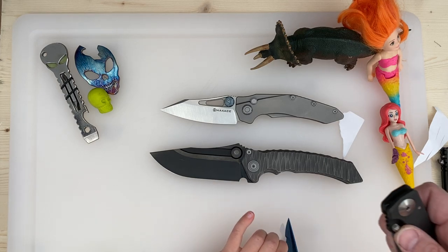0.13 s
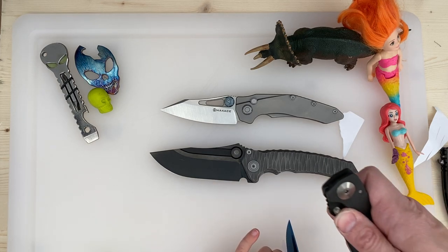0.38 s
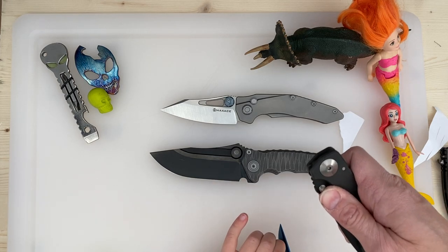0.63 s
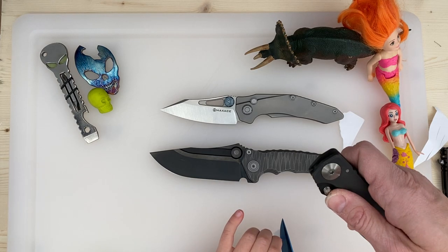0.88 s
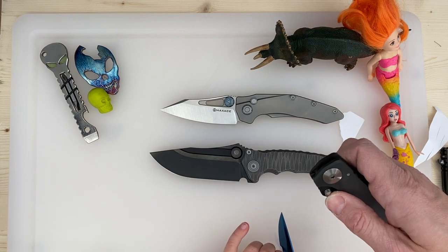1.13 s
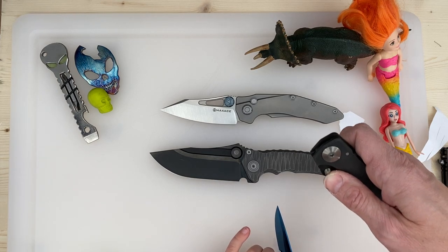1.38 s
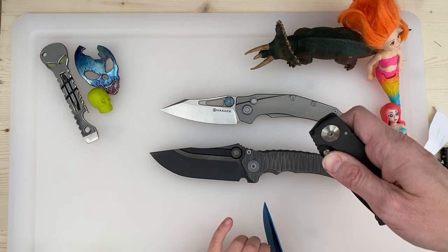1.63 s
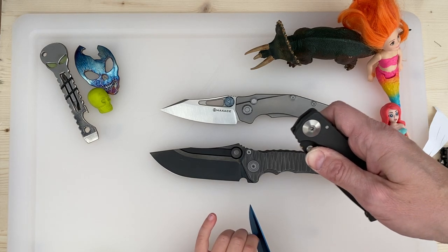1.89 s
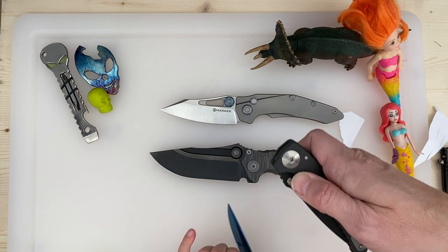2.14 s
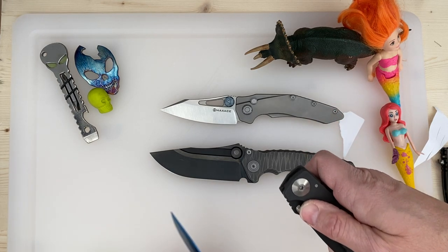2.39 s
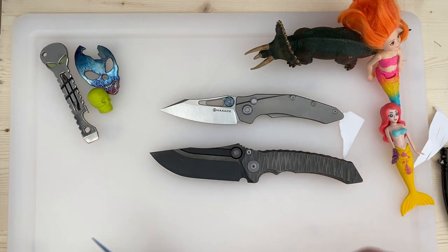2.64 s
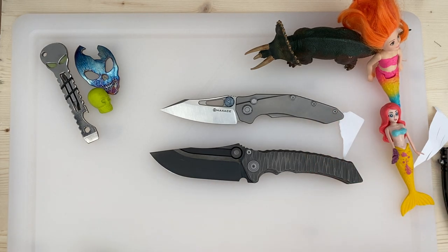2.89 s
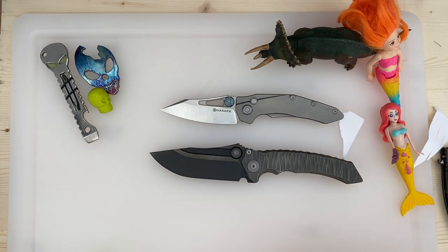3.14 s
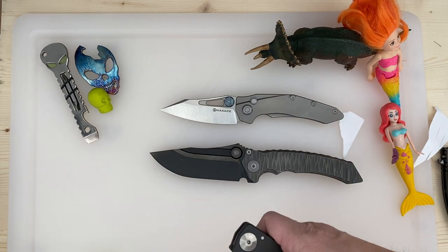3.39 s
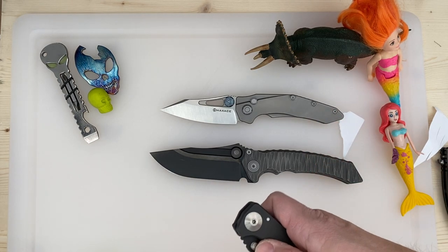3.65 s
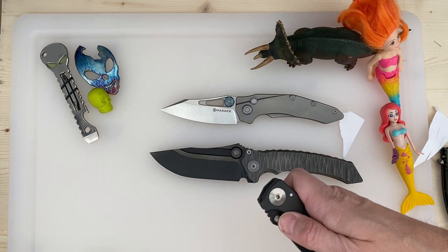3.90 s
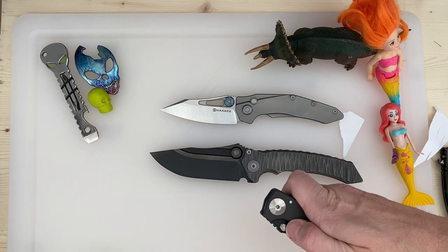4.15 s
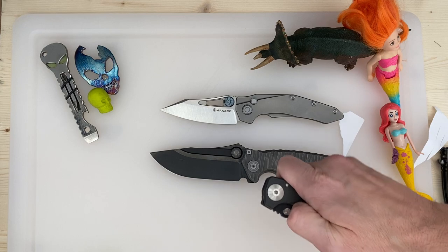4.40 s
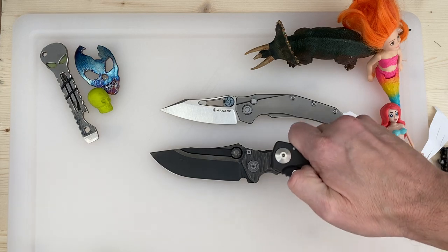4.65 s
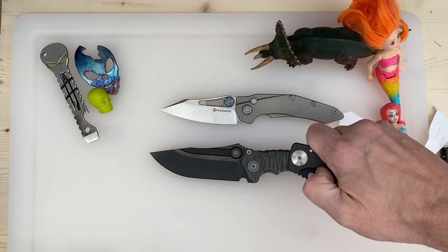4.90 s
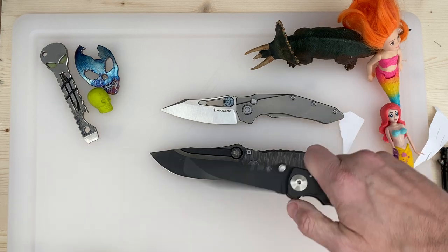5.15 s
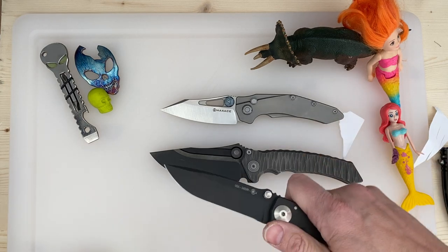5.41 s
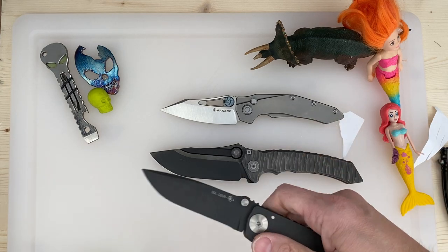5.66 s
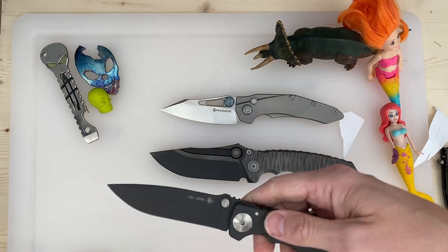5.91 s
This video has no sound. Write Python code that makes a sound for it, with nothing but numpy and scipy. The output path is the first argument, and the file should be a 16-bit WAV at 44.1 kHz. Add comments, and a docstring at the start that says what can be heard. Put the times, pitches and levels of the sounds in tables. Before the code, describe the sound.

In a quiet room with soft air noise and a low appliance drone, fingers and a blade brush a cutting board in short, dry, whispery strokes. They grow brighter and busier, with tiny ticks and a few soft thuds. A hand then shifts on a knife handle, and the blade flicks open with one loud, sharp metal snap and a brief rattle. Faint skin rubbing follows. Close stereo microphone, little reverberation.

```python
"""Board strokes and a folding knife in a quiet room

Steady noise and wavering low bands form the room tone and an appliance's drone. Fingers and a blade
slide in short strokes over a cutting board: dense micro-slips, coloured by board resonances, with ticks
and soft thuds of filtered noise. A hand shifts its grip on a folding knife and flicks it open: the blade
slips its detent and snaps into its lock, as damped modes, noise bursts and dying chatter."""
import sys
import numpy as np
from scipy import signal
from scipy.fft import rfft, irfft
from scipy.io import wavfile

SR = 44100
rng = np.random.default_rng(int(sys.argv[2]) if len(sys.argv) > 2 else 0)


def volts_from_decibels(level):
    """Turn decibel levels (scalar or array-like) into linear amplitude factors."""
    exponent = np.asarray(level, float) / 20
    return 10 ** exponent


def dump_mix(stems):
    """Bounce the given channels to the path in sys.argv[1] as a 16-bit WAV at rate SR."""
    frames = np.atleast_2d(stems).T  # one column per channel
    limited = np.clip(frames, -1, 1)  # hard clip at full scale
    pcm = np.round(limited * 32767).astype(np.int16)
    wavfile.write(sys.argv[1], SR, pcm)


N = 266099  # samples

# Spectrum of the air noise, relative: [f/Hz, density/dB per Hz]
AIR_SPECTRUM = [(20, -89.5), (50, -83), (80, -79), (105, -80.5), (160, -88), (250, -94.5), (330, -97.5),
                (620, -103), (1200, -102.5), (1600, -108), (2600, -109), (4000, -117), (6000, -124),
                (12000, -129), (16000, -136)]
# Left-right correlation of the room tone: [f/Hz, correlation]
ROOM_CORRELATION = [(30, .94), (100, 0.93), (170, 0.89), (380, 0.077), (950, .1), (2400, 0.065),
                    (15000, 0.17)]
# Left over right in the room tone: [f/Hz, level difference/dB]
ROOM_BALANCE = [(60, 1), (180, -4), (550, 1.5), (1650, 0), (4970, 5), (15000, -4)]
# Drone bands of the appliance: [f/Hz, full width at half amplitude/Hz, rms level/dB]
DRONE = [(96.5, 9.4, -62.5), (120.9, 8, -66), (242.4, 14, -76)]
# Decay of the room tail: [f/Hz, T60/s]
ROOM_T60 = [(500, 0.16), (2000, 0.47), (4500, 0.4), (8000, 0.3), (15000, 0.11)]
# Left-right correlation of the room tail: [f/Hz, correlation]
TAIL_CORRELATION = [(500, .2), (2000, .35), (5000, .5), (9000, 0.74), (15000, 0.76)]
# Fifth-octave band edges, f/Hz
BAND_EDGES = 560 * 2 ** np.arange(0, 5, 1 / 5)
# Strokes over the board: [t/s, length/s, first level/dB, last level/dB, dullness/dB]
STROKES = [(.0, 0.08, -71, -67, 8.5), (.085, 0.11, -70.5, -80, 13), (.212, 0.17, -60.5, -71, 3),
           (.502, 0.013, -65.5, -56.5, -3), (.556, 0.034, -75.5, -57, -8.5), (.6, 0.072, -67.5, -73.5, 2.5),
           (.66, 0.083, -73.5, -72, 9.5), (.757, 0.029, -64.5, -70.5, 8.5), (.79, 0.036, -80, -72, 10),
           (.958, 0.068, -75, -81, 2), (1.04, 0.14, -63.5, -69, 4), (1.2, 0.27, -77, -77, -4),
           (1.582, .012, -75, -73, -4), (1.598, 0.033, -65, -70.5, -1), (1.632, 0.021, -62, -66, 3.5),
           (1.71, 0.01, -63.5, -71, -6.5), (1.746, 0.023, -76, -60, -10), (1.8, 0.044, -94, -84, -3),
           (1.87, 0.13, -83.5, -74, -1), (2.19, 0.14, -63, -59.5, 3), (2.33, 0.18, -68, -64, 5.5),
           (2.545, 0.22, -79.5, -86, 2.5), (2.75, 0.0079, -69, -73, -9), (2.792, 0.14, -65, -58, -0.5),
           (2.94, 0.032, -61.5, -67.5, 0), (3.094, 0.022, -62.5, -60.5, 4), (3.122, 0.13, -57.5, -52, 2),
           (3.255, 0.046, -55, -58.5, 3.5), (3.31, 0.055, -64.5, -60.5, 6.5), (3.452, 0.03, -68, -83, -5),
           (3.562, .02, -65.5, -73, -2), (3.6, 0.046, -73, -64, -2.5), (3.664, 0.015, -66, -61, -6),
           (3.68, 0.11, -65.5, -51, -4.5), (3.8, 0.051, -57, -67, 2), (3.87, 0.098, -68, -85, 5),
           (4.008, 0.24, -70.5, -78.5, 9.5), (4.24, 0.0074, -54.5, -65, 5), (4.264, 0.097, -57.5, -72, 0.5),
           (4.42, 0.16, -70, -80, 5)]
# Skin moving on the handle: [t/s, length/s, first level/dB, last level/dB, dullness/dB]
GRIP_MOVES = [(4.3, .18, -70.5, -64.5, 4), (4.49, 0.1, -66.5, -80.5, 1), (4.692, 0.03, -62, -52, -2),
              (4.73, 0.028, -54, -56, -4.5), (4.76, 0.16, -61.5, -80.5, 1), (4.91, .11, -79, -76.5, 6.5),
              (5.12, 0.026, -76.5, -71.5, -1.5), (5.158, 0.022, -61.5, -63, -16),
              (5.18, .022, -59.5, -56.5, -1), (5.5, 0.18, -77, -79.5, 1.5), (5.686, 0.18, -67.5, -79, 0.5),
              (5.82, 0.16, -71.5, -64, 2.5), (5.99, .05, -63, -69, 1)]
# Friction spectrum on the board, relative: [f/Hz, density/dB per Hz]
STROKE_SPECTRUM = [(600, -9.5), (1200, -2.5), (2200, -1.5), (4000, -2), (6000, -2), (8500, -1), (12500, 5),
                   (14500, -3), (15700, 0), (16300, -30)]
# Friction spectrum on the handle, relative: [f/Hz, density/dB per Hz]
GRIP_SPECTRUM = [(600, -3), (900, -5.5), (1450, -2.5), (1900, -3.5), (2500, -1.5), (5000, -5), (7000, -8),
                 (8500, -9.5), (11000, -9.5), (15500, -18.5), (16500, -35)]
# Left-right correlation of all friction: [f/Hz, correlation]
FRICTION_CORRELATION = [(600, .5), (2000, 0.12), (5000, 0.24), (7500, 0.82), (15000, 0.9)]
# Rasp of the contact, a resonance moving from stroke to stroke: [t/s, f/Hz, gain/dB]
RASP = [(0, 5300, 9), (.05, 4400, 18), (.1, 3800, 13), (.18, 3800, 2), (.2, 6200, 2), (.48, 6200, 1),
        (.49, 11000, 3), (.52, 11000, 12), (.6, 10400, 7), (.63, 10400, 0), (.64, 6300, 7), (.68, 6300, 9),
        (.78, 5230, 6), (1.02, 6300, 6.5), (1.48, 6200, 6.5), (1.58, 3470, 12), (1.74, 3400, 13),
        (1.85, 6200, 6), (2.19, 6000, 5.5), (2.27, 6070, 6), (2.3, 3900, 9), (2.36, 5900, 5),
        (2.52, 6100, 5), (2.76, 4300, 5), (2.97, 3480, 11), (3.09, 4040, 8), (3.23, 4160, 9),
        (3.27, 5300, 3), (3.38, 5000, 10), (3.698, 5000, 8), (3.78, 4970, -2), (3.8, 3900, 7.5),
        (3.95, 3900, -4), (4.22, 5030, -1), (4.26, 5030, 10.5), (4.4, 5030, -1), (4.45, 2200, 0),
        (4.68, 1450, 15), (4.755, 1450, 9), (4.77, 1500, 0), (4.8, 2400, 0), (5.11, 2400, 3),
        (5.66, 7440, 1), (5.78, 7400, 3), (5.84, 1490, -3), (6.03, 1495, 11.5)]
# Board resonances under the strokes: [f/Hz, width/Hz, mean gain/dB]
BOARD = [(1850, 130, -8.5), (2200, 150, -7), (2870, 150, -9), (3680, 200, -6.5), (4500, 130, -7.5),
         (5110, 140, -7.5), (5880, 150, -7), (6470, 120, -6.5), (8640, 190, -1), (9400, 460, -3),
         (10500, 120, -3.5), (11550, 380, -7), (12300, 300, -6), (14920, 500, -6)]
# Small ticks: [t/s, peak level/dB, centre f/Hz]
TICKS = [(.2079, -60, 11800), (.524, -56, 3300), (.555, -56, 11000), (1.632, -60, 3300), (1.645, -59, 3600),
         (1.711, -59, 1750), (1.721, -60, 1750), (1.722, -58, 3400), (1.7434, -47, 11600),
         (2.555, -59, 11500), (2.6647, -57, 11000), (2.772, -56, 9800), (2.7857, -50, 9460),
         (3.123, -46.5, 5040), (3.4982, -56.5, 10000), (3.5597, -43.5, 10800), (3.562, -60, 5000),
         (3.571, -60, 5000), (3.64, -52, 10800), (3.684, -38.5, 11000), (3.686, -55, 5000),
         (3.798, -34.5, 10660), (3.802, -49.5, 4000), (3.803, -58, 1700), (3.822, -49, 11500),
         (3.7946, -31, 13900), (3.849, -42, 11170), (4.0088, -53, 10500), (4.0254, -53, 11000),
         (4.2378, -37, 11100), (4.2623, -46, 12700), (4.2627, -48, 5030), (4.352, -44.5, 9900),
         (4.4394, -48, 11000), (4.55, -55, 12000), (5.1566, -43, 2057), (5.1569, -38, 7340),
         (5.197, -43, 2400), (5.2, -44, 3590), (5.2, -45, 2003), (5.2, -51, 6700), (5.6845, -55, 6020),
         (5.7237, -53, 3790)]
# Soft thuds on the board: [t/s, peak level/dB, f/Hz]
THUDS = [(3.775, -52.5, 1000), (3.794, -51, 1060), (3.798, -57, 1610), (3.801, -55, 580)]
# Blade slipping its detent: (t/s, peak level/dB, f/Hz)
DETENT = (5.198, -40, 2620)
# Contacts of blade, stop pin and lock: [t/s, strength/dB, f/Hz above which modes are excited]
CONTACTS = [(5.2229, -9.5, 6000), (5.2236, -16.5, 0), (5.2251, 1, 6000), (5.2365, -30.5, 0),
            (5.2248, -9, 0)]
STRIKE_S = CONTACTS[-1][0]  # onset of knock, edge and chatter
# Modes of the knife: [f/Hz, peak level/dB, T60/s, left over right/dB]
KNIFE_MODES = [(1746, -26, 0.02, 3), (2060, -28.5, 0.03, 4), (2400, -26.5, 0.026, 4.5),
               (2770, -41.5, .03, -1.5), (3180, -40.5, .02, 5), (3380, -46, 0.27, 2),
               (3416, -16, 0.016, 7.5), (4200, -29.5, 0.02, 4), (4455, -22.5, 0.012, -1.5),
               (4530, -19, 0.007, 12.5), (4900, -16.5, 0.0067, 0), (5020, -23, 0.0085, -1),
               (6450, -33, 0.011, 0), (7240, -33, .012, 1), (8840, -19, 0.005, -1), (9760, -23, 0.005, 2.5),
               (12400, -19.5, 0.005, 1.5), (14300, -22.5, 0.005, 1), (1250, -35.5, 0.0091, -6)]
# Chatter of the loose parts: [low f/Hz, high f/Hz, relative level/dB, T60/s]
CHATTER = [(1750, 2700, -38.5, 0.15), (3267, 3550, -42, .3), (4260, 5150, -33, 0.28),
           (5600, 8300, -39.5, 0.14), (8000, 12500, -45, 0.17)]


def rms_one(x):
    """Normalisation: a signal divided by its root mean square."""
    return x / np.sqrt(np.mean(x ** 2) + 1e-20)


def at_hz(points, hz):
    """Spectral interpolation: a table is read linearly on a logarithmic frequency axis."""
    table = np.array(points)
    return np.interp(np.log(hz), np.log(table[:, 0]), table[:, 1])


def drift(rate_hz):
    """Slow random modulation: noise through two equal low-pass poles, scaled to rms 1."""
    r = np.exp(-80 * np.pi * rate_hz / SR)  # computed at one value per 40 samples
    slow = signal.lfilter([1], [1, -2 * r, r * r], rng.standard_normal(N // 40 + 2002))[2000:]
    return np.interp(np.arange(N) / 40, np.arange(len(slow)), rms_one(slow))


def band(x, low_hz, high_hz):
    """Band limitation: a Butterworth filter passes one range of frequencies."""
    return signal.sosfilt(signal.butter(2, [low_hz, high_hz], "band", fs=SR, output="sos"), x)


def ring(excitation, hz, t60):
    """Damped oscillator: a unit impulse starts a sine of initial height 1 that decays exponentially."""
    r, w = volts_from_decibels(-60 / (t60 * SR)), 2 * np.pi * hz / SR
    return signal.lfilter([0, np.sin(w)], [1, -2 * r * np.cos(w), r * r], excitation + 1e-18)


def spread(mid, side, correlation):
    """Stereo correlation: the ratio of two independent signals sets how alike left and right are."""
    correlation = np.clip(correlation, -1, 1)
    return np.sqrt(1 + correlation) * mid + np.sqrt(1 - correlation) * side * [[1], [-1]]


def room_tone():
    """Stationary noise: air noise and narrow random bands, the wavering drone, add in power."""
    hz = np.maximum(np.fft.rfftfreq(N, 1 / SR), 1)
    air = volts_from_decibels(at_hz(AIR_SPECTRUM, hz))
    power = (volts_from_decibels(-60.5) * rms_one(air)) ** 2
    for centre_hz, width_hz, level_db in DRONE:
        peak = 1 / (1 + (2 * (hz - centre_hz) / width_hz) ** 2)
        power = power + (volts_from_decibels(level_db) * rms_one(peak)) ** 2
    mid, side = rfft(rng.standard_normal((2, N)))
    pan = volts_from_decibels(at_hz(ROOM_BALANCE, hz) * np.array([[.5], [-.5]]))
    correlation = at_hz(ROOM_CORRELATION, hz)
    # the division keeps the half-sum of the channels at the stated power
    return irfft(np.sqrt(power / (1 + correlation)) * pan * spread(mid, side, correlation), N)


def room(x):
    """Reverberation: convolution with noise that decays band by band, plus faster early scatter."""
    t = np.arange(int(.4 * SR)) / SR
    mid, side = rng.standard_normal((2, len(t)))
    tail = 0
    for low, high in zip(BAND_EDGES, BAND_EDGES[1:]):
        hz = np.sqrt(low * high)
        noise = band(spread(mid, side, at_hz(TAIL_CORRELATION, hz)), low, high)
        late = volts_from_decibels(-60 * t / at_hz(ROOM_T60, hz))
        early = volts_from_decibels(7 - 60 * t / 0.045)
        tail = tail + noise * (late + early)
    tail = tail * np.clip((t - .002) / .004, 0, 1)  # silent for 2 ms, then a 4 ms rise
    unit_tail = tail / np.sqrt(np.sum(tail ** 2) / 2)
    return signal.fftconvolve(x, unit_tail, axes=1)[:, :N]


def ports(x):
    """Arrival-time difference: the treble of close sounds reaches the left port late."""
    lag_s, split_hz = 0.0001864, 7560
    hz = np.fft.rfftfreq(N, 1 / SR)
    late = 1 / (1 + (split_hz / (hz + 1)) ** 24)
    turns = late * (hz * lag_s - 1)  # the whole turn taken off matters only around the split
    left = irfft(rfft(x[0]) * np.exp(-2j * np.pi * turns), N)
    return np.array([left, x[1]])


def joined(moves, catch_db_per_s, lift_db_per_s):
    """Power addition: moves catch, glide in level and lift off; the loudest dominates the dullness."""
    t = np.arange(0, N + 20, 20) / SR
    power, dull_db = 1e-11, 0
    for s, length_s, first_db, last_db, own_dull_db in moves:
        glide_db = np.interp(t, [s, s + length_s], [first_db, last_db])
        catch_db = catch_db_per_s * np.maximum(s - t, 0)
        lift_db = lift_db_per_s * np.maximum(t - s - length_s, 0)
        own_power = volts_from_decibels(2 * (glide_db - catch_db - lift_db))
        power = power + own_power
        dull_db = dull_db + own_dull_db * own_power
    return [np.interp(np.arange(N) / SR, t, c) for c in (10 * np.log10(power), dull_db / power)]


def friction(level_db, dull_db, spectrum, per_s, grain_db, patchy_db, pivot_hz):
    """Stick-slip friction: uneven micro-slips; dullness tilts their spectrum and the rasp lifts one band."""
    sizes = volts_from_decibels(grain_db * np.minimum(rng.exponential(1, (4, N)), 5)) * rng.choice([-1, 1], (4, N))
    slips = (sizes * (rng.random((4, N)) < per_s / SR)).reshape(2, 2, N)
    s, *rasp = np.transpose(RASP)
    rasp_hz, rasp_db = [np.interp(np.arange(0, N, 20) / SR, s, c) for c in rasp]
    out, power, judder = 0, 0, drift(25.0)
    for k, (low, high) in enumerate(zip(BAND_EDGES, BAND_EDGES[1:])):
        hz = np.sqrt(low * high)
        mid, side = rms_one(band(slips[k % 2], low, high))  # neighbouring bands use unrelated slips
        tilt_db = dull_db[::20] * np.tanh(np.log2(pivot_hz / hz))
        lift_db = rasp_db * np.exp(-.5 * (np.log2(hz / rasp_hz) / .14) ** 2)  # spread .14 octave
        shape = np.sqrt(high - low) * volts_from_decibels(at_hz(spectrum, hz) + tilt_db + lift_db)
        patches = volts_from_decibels(patchy_db * (0.3 * judder + drift(6.2)))
        stereo = spread(mid, side, at_hz(FRICTION_CORRELATION, hz))
        out = out + np.repeat(shape, 20)[:N] * patches * stereo
        power = power + shape ** 2
    return volts_from_decibels(level_db) * out / np.repeat(np.sqrt(power), 20)[:N]


def strokes():
    """Forced resonance: friction on the board drives resonances whose gains wander slowly."""
    level_db, dull_db = joined(STROKES, catch_db_per_s=3000.0, lift_db_per_s=1000.0)
    hiss = friction(level_db, dull_db, STROKE_SPECTRUM, per_s=5000.0, grain_db=3.0, patchy_db=2.0,
                    pivot_hz=6000)
    out = 0.61 * hiss
    for hz, width_hz, gain_db in BOARD:
        resonance = signal.lfilter(*signal.iirpeak(hz, hz / width_hz, SR), hiss)
        out = out + volts_from_decibels(gain_db + 3.5 * drift(5.0)) * resonance
    return out


def grip():
    """Stick-slip friction of skin on the handle."""
    level_db, dull_db = joined(GRIP_MOVES, catch_db_per_s=1399.5, lift_db_per_s=900)
    return friction(level_db, dull_db, GRIP_SPECTRUM, per_s=4500.0, grain_db=3.0, patchy_db=1.0,
                    pivot_hz=3002)


def ticks(t60=0.0055, cycles=6.7):
    """Transient noise: a puff around its own centre over a broad crack; low ones last longer."""
    out, t = np.zeros(N), np.arange(3000) / SR
    noise = rng.standard_normal((len(TICKS), len(t)))
    for (s, peak_db, hz), puff in zip(TICKS, noise):
        puff = puff * volts_from_decibels(-60 * t / (t60 + cycles / hz)) * np.minimum(t / 0.00079, 1)
        core = band(puff, hz / 1.23, min(hz * 1.3, 16500))
        crack = band(puff, hz / 2.1, min(hz * 1.0, 16000))
        tick = core + 0.33 * crack
        at = round(s * SR)
        out[at:at + len(t)] += volts_from_decibels(peak_db) * tick / np.abs(tick).max()
    return out


def thuds():
    """Excited resonance: short puffs of noise ring the board at a low pitch."""
    out, t = np.zeros(N), np.arange(3000) / SR
    noise = rng.standard_normal((len(THUDS), len(t)))
    for (s, peak_db, hz), puff in zip(THUDS, noise):
        push = band(puff * t * volts_from_decibels(-60 * t / 0.026), hz / 1.7, hz * 2.2)
        thud = ring(push, hz, t60=.009)
        at = round(s * SR)
        out[at:at + len(t)] += volts_from_decibels(peak_db) * thud / np.abs(thud).max()
    return out


def detent():
    """Coupled oscillators: one damped ring drives another of equal pitch, so the tone swells and dies."""
    s, peak_db, hz = DETENT
    click = np.zeros(N)
    click[round(s * SR)] = 1
    mode = ring(ring(click, hz, t60=.008), hz, t60=.008)
    return volts_from_decibels(peak_db) * mode / np.abs(mode).max()


def chatter():
    """Repeated impact: dense uneven touches of the loose parts die away in broad bands of the knife."""
    since = np.arange(N) / SR - STRIKE_S
    sizes = volts_from_decibels(3.0 * rng.exponential(1, (2, N))) * rng.choice([-1, 1], (2, N))
    touches = sizes * (rng.random((2, N)) < 3000.0 / SR)  # 3000 touches per second
    out = 0
    for low_hz, high_hz, level_db, t60 in CHATTER:
        mid, side = rms_one(band(band(touches, low_hz, high_hz), low_hz, high_hz))
        decay = volts_from_decibels(level_db - 60 * np.maximum(since, 0) / t60)
        rise = np.clip(since / .006, 0, 1)
        out = out + decay * rise * spread(mid, side, .3)
    return out


def snap():
    """Impulse response: a single sharp edge as the lock strikes, limited to a broad band."""
    edge = np.zeros(N)
    edge[round(STRIKE_S * SR)] = 1
    return band(edge, 2400, 12000)


def lock(swell_s=0.0052):
    """Modal excitation: contacts wake all or only high modes, which swell, over a knock and a crack."""
    out, s = np.zeros((2, N)), np.transpose(CONTACTS)[0]
    for k, (hz, level_db, t60, pan_db) in enumerate(KNIFE_MODES):
        clicks = np.zeros(N)
        strengths = [volts_from_decibels(strength_db) * (hz > lowest_hz) for _, strength_db, lowest_hz in CONTACTS]
        clicks[np.round(s * SR).astype(int)] = strengths
        mode = ring(ring(clicks, hz, swell_s), hz, t60)  # the first ring, of T60 swell_s, gives the swell
        gain = volts_from_decibels(level_db + pan_db * np.array([[.5], [-.5]]))
        out += gain * (-1) ** k * mode / np.abs(mode).max()
    blow = np.zeros(N)
    blow[round(STRIKE_S * SR)] = volts_from_decibels(-5.0)
    knock = band(blow, 300, 1900) * volts_from_decibels([[-2.5], [1.5]])
    since = np.maximum(np.arange(N) / SR - s[0], 0)  # the crack grows from the first contact
    burst = volts_from_decibels(-1.5 - 60 * since / 0.01) * np.minimum(since / swell_s, 1) * rng.standard_normal(N)
    return out + knock + band(burst, 4800, 10500)


def scene():
    """Superposition: close sounds and their reverberation pass the ports, and the room tone is added."""
    rubbing = strokes() + grip()
    hits = detent() + ticks() + thuds()
    edge = snap()
    knife = lock() + chatter()
    wet = room(volts_from_decibels(-21) * knife + volts_from_decibels(-10.5) * hits + volts_from_decibels(-12.0) * edge + volts_from_decibels(-10.5) * rubbing)
    return ports(knife + hits + volts_from_decibels(-5.5) * edge + rubbing + wet) + room_tone()


def band_limit(x):
    """A steep low-pass at the top of the band."""
    return signal.sosfilt(signal.butter(12, 16870, fs=SR, output="sos"), x)


def record(dry):
    """Low-pass filtering: a steep Chebyshev filter cuts the top of the spectrum."""
    mix = signal.sosfilt(signal.cheby2(10, 25, 16400, fs=SR, output="sos"), dry)
    return band_limit(mix)


dry = scene()
out = record(dry)
dump_mix(out)
```